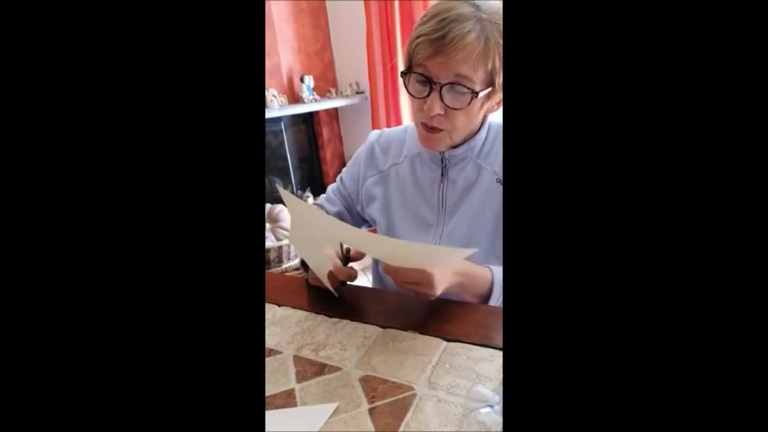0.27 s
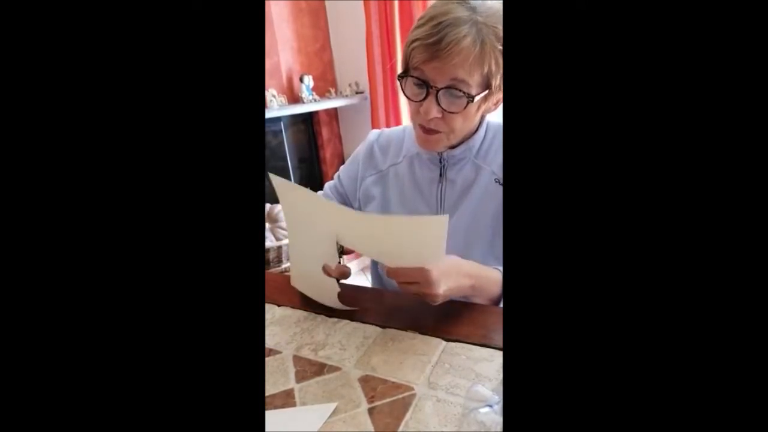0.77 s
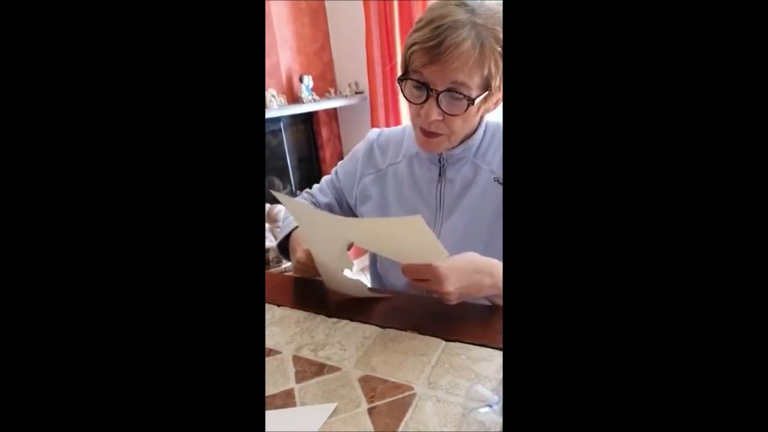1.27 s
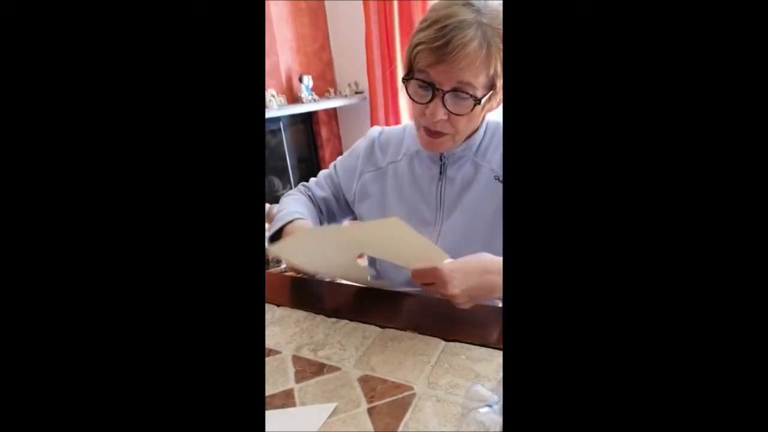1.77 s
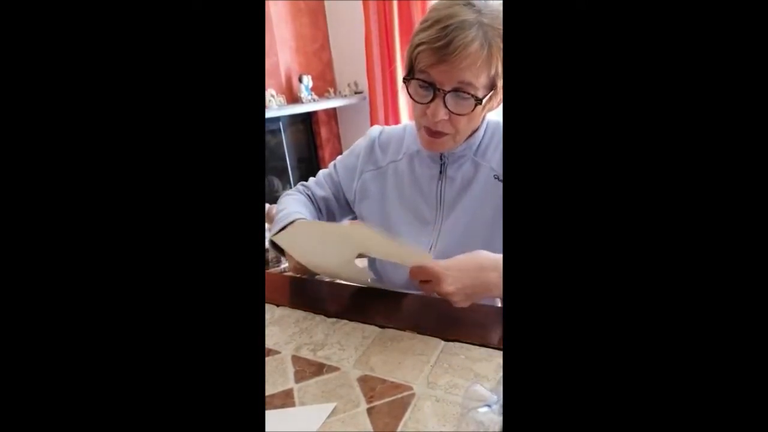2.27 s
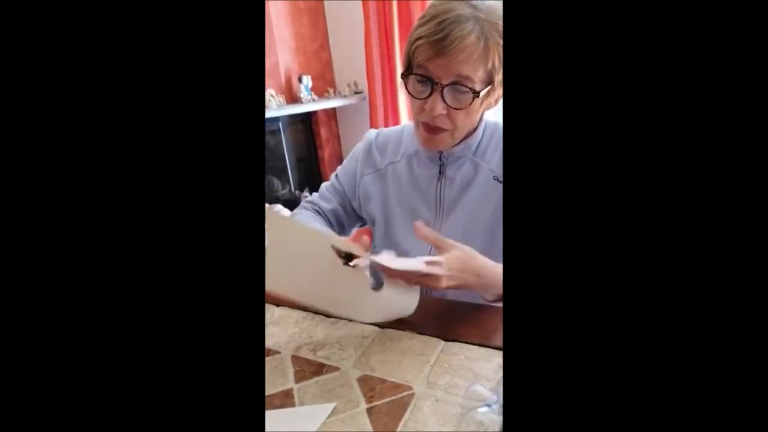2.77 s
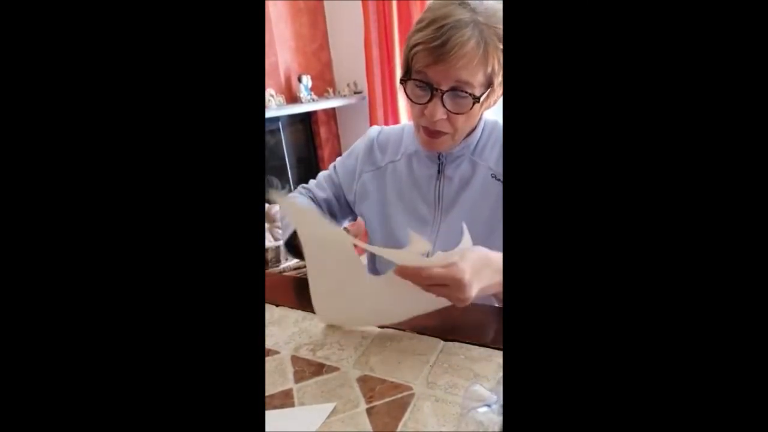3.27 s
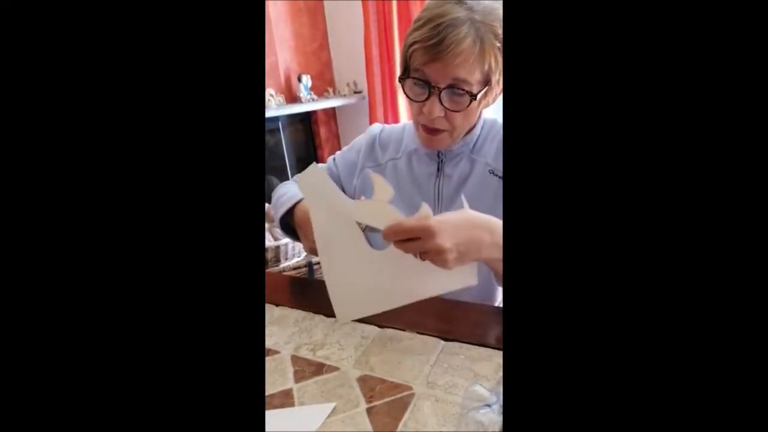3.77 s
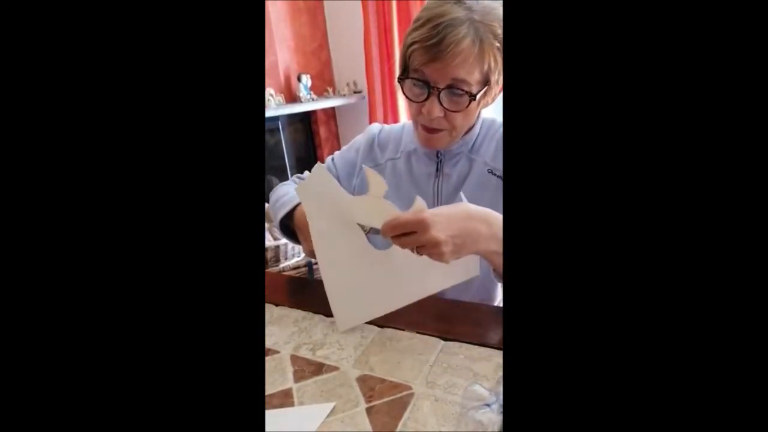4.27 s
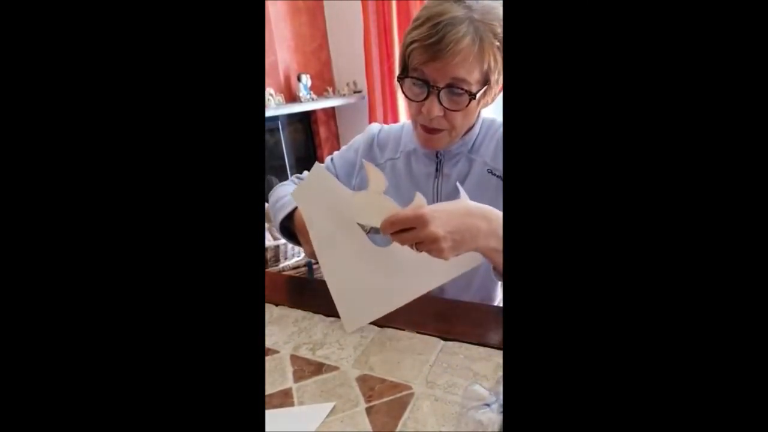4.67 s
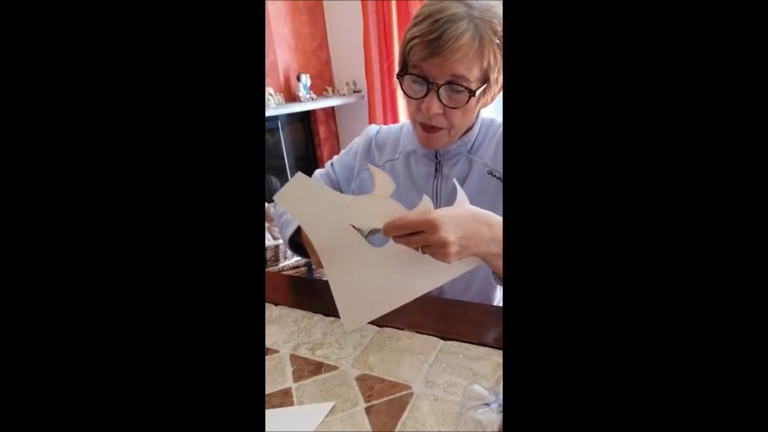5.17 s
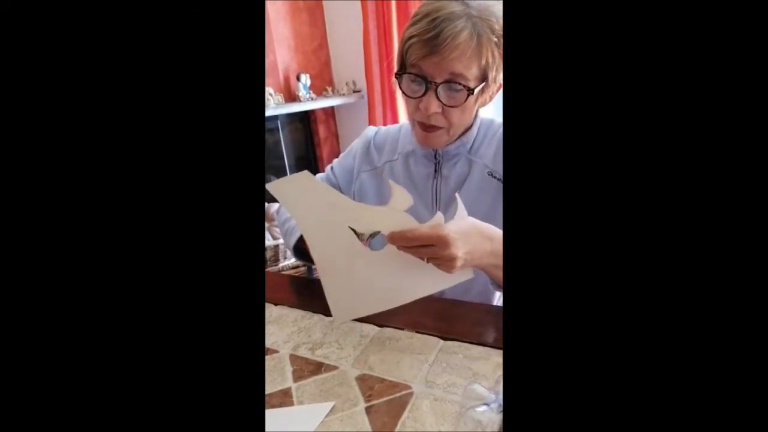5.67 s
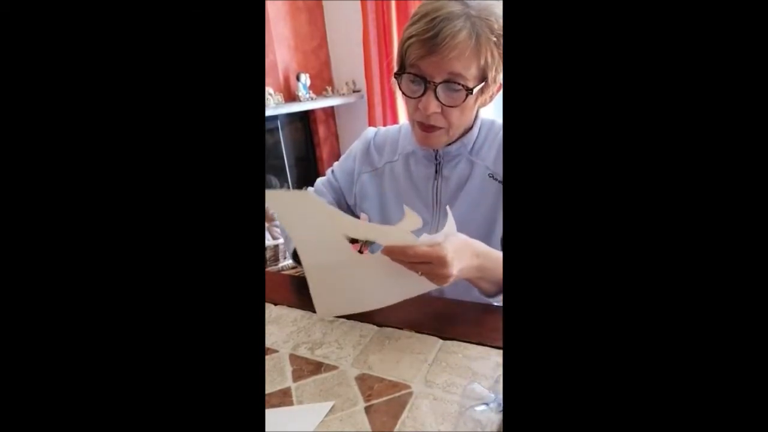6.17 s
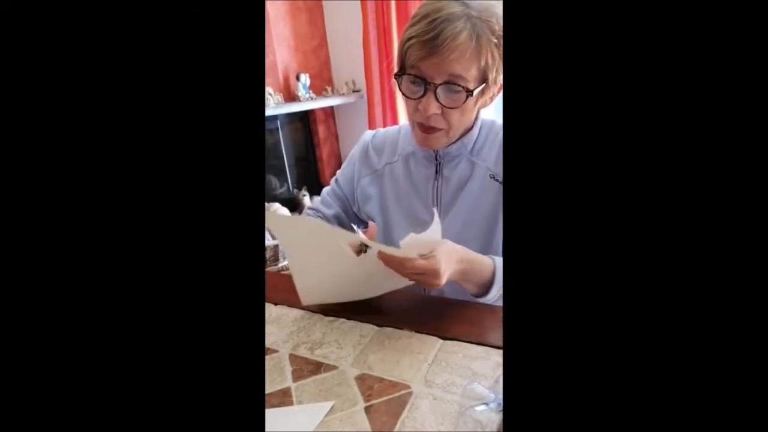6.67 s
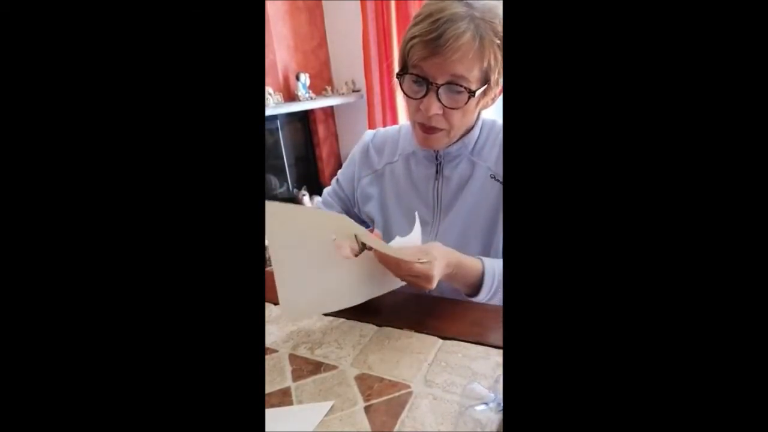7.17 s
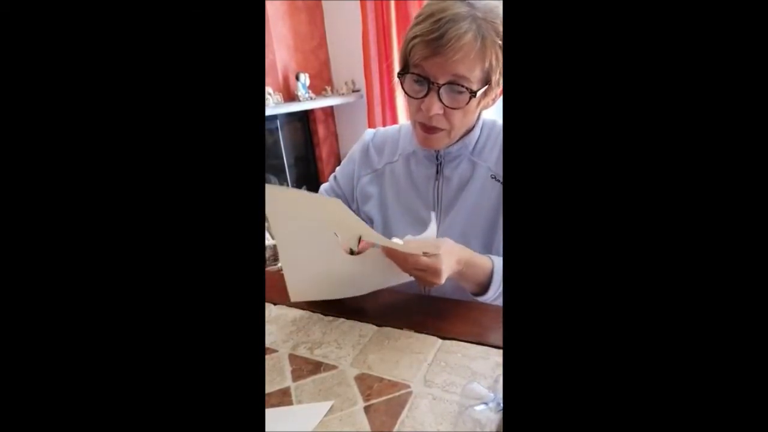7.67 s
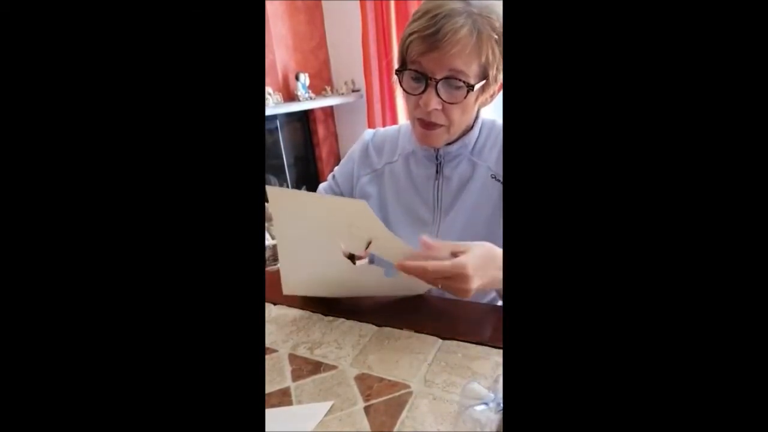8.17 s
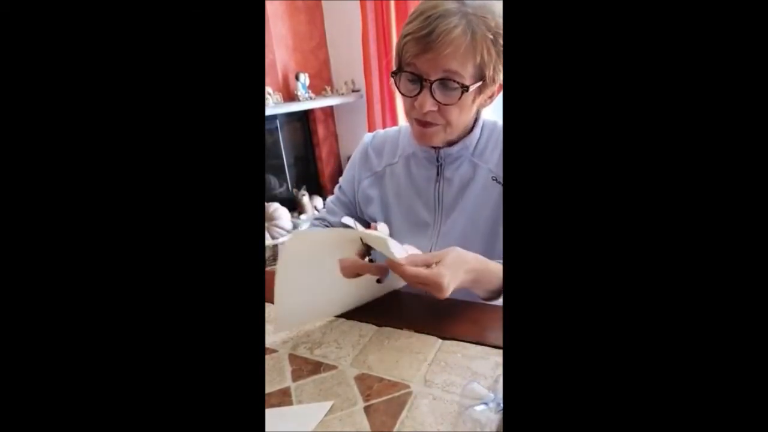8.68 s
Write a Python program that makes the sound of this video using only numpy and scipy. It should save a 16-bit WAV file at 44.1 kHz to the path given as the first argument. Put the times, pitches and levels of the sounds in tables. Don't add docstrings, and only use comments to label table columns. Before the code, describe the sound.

Close in a small quiet room, steady faint hiss and uneven low rumble lie beneath scissors cutting stiff paper. From 0 to 1.8 seconds the sheet bends with dense dry fibre clicks, hollow crease pops and irregular snips, the clearest near 1.3, plus soft table thumps. Around 2 the turned sheet gives a low weak wobble. From 2.7 to 3.6 handling grows busiest: hard finger rubbing, bright crackles, quick snaps and a dull bump. From 3.8 to 5.5 it thins to light shearing, a snip at 4.4 and a faint, high, fuzzy pivot squeak near 5. Snips resume from 5.6, with a bright scrape at 6.2. The hardest, sharpest snap lands near 6.8, then a short squeak at 7. Crisp rustling and snips continue to 8, the sheet wobbles near 8.5, and cutting swells again towards the end at about 9.

```python
import sys
import numpy as np
from scipy import signal
from scipy.fft import rfft, irfft, next_fast_len
from scipy.io import wavfile
from scipy.ndimage import uniform_filter1d

SR = 44100
rng = np.random.default_rng(int(sys.argv[2]) if len(sys.argv) > 2 else 0)


def pcm_store(signal):
    levels = np.round(np.clip(np.atleast_2d(signal), -1, 1) * 32767)
    wavfile.write(sys.argv[1], SR, levels.astype(np.int16).T)


def volts_from_decibels(level):
    exponent = np.asarray(level, float) / 20
    return 10 ** exponent


N = 393813

# f/Hz, level per Hz/dB
PAPER_COLOUR = [(65, -50), (110, -28), (375, -12.5), (556, 3), (729, -2), (879, 2), (1390, -4.5),
                (1860, -4), (2820, -4), (3840, -19), (7170, -13.5), (8830, -15.5), (10900, -27.5),
                (14500, -34), (15800, -27)]
PART_EDGES = [110, 1400, 3900, 10500, 15500]
# f/Hz, level/dB
HUSH_COLOUR = [(12, -32), (20, -5.5), (133, -11), (176, -11.5), (209, -15.5), (308, -15), (386, -20),
               (419, -18), (2370, -25), (3910, -30.5), (5500, -29.5), (15800, -35.5)]
# start t/s, length/s, level/dB, swell over the stroke/dB
BENDS = [(0.0, 0.24, -50, 4), (0.003, 0.021, -38.5, -6.5), (0.39, 0.13, -46.5, -0.8),
         (0.639, 0.18, -43.5, -7.5), (0.918, 0.25, -50.5, -28), (0.948, 0.6, -50.5, -12),
         (1.207, 0.21, -48.5, 6), (1.435, 0.26, -51.5, -3.5), (1.598, 0.036, -43.5, 0),
         (1.741, 0.019, -44.5, 5.5), (1.8, 0.67, -55, -12), (2.298, 0.044, -47, 3), (2.554, 0.098, -64, 13),
         (2.75, 0.5, -55, 5), (2.981, 0.19, -37.5, -31), (3.283, 0.011, -54, 8), (3.54, 0.08, -45, -1),
         (5.579, 0.026, -45, -17), (5.707, 1.4, -65, -1.5), (6.169, 1.9, -59.5, -22),
         (6.659, 0.27, -46.5, -7.5), (6.772, 0.031, -57, -13), (7.197, 0.35, -49, -6.5),
         (7.676, 0.034, -63, 10), (7.725, 0.039, -50, 2.5), (7.758, 0.14, -65, 10),
         (8.017, 0.11, -56.5, 9.5), (8.35, 0.29, -53, 3), (8.578, 0.073, -48, -15)]
# start t/s, length/s, level/dB, swell over the stroke/dB
CUTS = [(0.267, 0.58, -56.5, -0.5), (0.403, 0.03, -57, -12), (1.185, 0.38, -46, -15),
        (1.879, 0.4, -48, -24), (2.277, 0.09, -54, 9.5), (2.562, 0.073, -53, -1), (2.768, 0.38, -51, -8),
        (3.226, 0.15, -59.5, 15), (3.388, 0.22, -58, 13.5), (3.646, 0.37, -62.5, 6.5),
        (4.298, 0.22, -47.5, -6.5), (4.622, 0.02, -63.5, 5.5), (4.9, 0.28, -59, 12.5),
        (5.248, 0.16, -50, 3.5), (5.59, 0.25, -55.5, 2), (6.166, 0.2, -54, -31), (6.477, 0.64, -72, 13),
        (6.535, 0.12, -52.5, -12), (6.66, 0.075, -59, 3), (6.8, 0.047, -61, -21), (6.857, 0.15, -50.5, 1.5),
        (7.154, 0.17, -55.5, 6.5), (7.427, 0.32, -43, -53), (7.913, 0.15, -62.5, 18),
        (8.213, 0.029, -58.5, 7), (8.378, 0.36, -48.5, -3.5), (8.829, 0.24, -46, 29)]
# start t/s, length/s, level/dB, swell over the stroke/dB
RUBS = [(0.398, 0.099, -50, -13), (0.636, 0.069, -47.5, 9), (0.738, 0.1, -44, -4.5), (0.947, 0.47, -50, -2),
        (1.553, 0.64, -61.5, 3.5), (1.89, 0.08, -58, 13), (2.118, 0.99, -62, 1), (2.72, 0.21, -61.5, 15.5),
        (2.979, 0.064, -40.5, 3), (3.093, 0.09, -42, 2), (3.219, 0.025, -37, -6.5),
        (3.286, 0.064, -38.5, -7), (3.451, 0.67, -50, -24), (3.783, 0.024, -54.5, 7),
        (4.265, 0.17, -57.5, 5.5), (4.787, 0.095, -64.5, 6), (4.888, 0.042, -52.5, 5.5),
        (4.95, 0.43, -50.5, 3), (5.357, 0.16, -48, -20.5), (5.575, 0.032, -51, 1.5),
        (5.711, 0.16, -49.5, -9.5), (6.042, 0.33, -67, 17), (6.178, 0.11, -42, -4), (6.562, 0.079, -57, 10),
        (6.622, 0.04, -45.5, -6), (6.71, 0.03, -53, 8.5), (6.978, 0.045, -52.5, 1),
        (7.205, 0.1, -54.5, 6.5), (7.417, 0.15, -45, -9.5), (7.669, 0.03, -50.5, 1.5),
        (7.724, 0.064, -44.5, -5), (7.852, 0.24, -56.5, -10), (8.008, 0.089, -45.5, -7.5),
        (8.334, 0.22, -60.5, 20.5), (8.593, 0.45, -54, 20)]
# start t/s, length/s, level/dB, swell over the stroke/dB
SLIDES = [(0.402, 0.04, -75, -1.5), (0.655, 0.069, -65, 2), (1.102, 0.096, -75, 4), (1.921, 0.064, -67, 8),
          (2.98, .04, -67, -1.5), (3.59, 0.027, -59.5, -5), (4.626, 0.018, -78, -1.5),
          (5.583, 0.035, -68, -1.5), (6.181, 0.046, -49, -6.5), (7.649, .006, -68, -6),
          (8.531, 0.082, -64, -1.5), (8.832, .1, -71, 16)]
# flexing/dB, blade edge/dB, fibre fizz/dB, finest fizz/dB
STIRRED_PARTS = [(-3.5, -9.5, -11.5, -19.5), (-11, -4, -8.5, -35), (-15, -7, -3, -11.5),
                 (-30, -30, -6, 13.5)]
# t/s, ring f/Hz, ring level/dB
CREASES = [(0.105, 470, -42.5), (0.202, 508, -37.5), (0.284, 450, -48.5), (0.385, 560, -50),
           (0.497, 594, -43), (0.7, 585, -49), (0.914, 690, -50.5), (0.975, 485, -45.5), (1.072, 610, -46),
           (1.189, 965, -45.5), (1.23, 840, -43), (1.285, 588, -43.5), (1.59, 530, -47), (1.613, 512, -39),
           (1.877, 576, -68), (2.292, 1188, -42.5), (2.335, 706, -55), (5.28, 1126, -46.5),
           (3.022, 526, -44), (3.444, 584, -66), (3.55, 427, -67), (5.599, 1000, -46), (7.493, 796, -46.5),
           (7.719, 697, -49.5), (7.853, 743, -45), (8.145, 450, -53), (8.218, 533, -56), (8.35, 480, -56)]
# t/s, edge peak level/dB, ring f/Hz, ring level/dB, fizz level/dB
SNIPS = [(0.429, -30.5, 575, -38.5, -42.5), (0.943, -49, 735, -54, -40), (1.335, -24.5, 682, -41.5, -37),
         (1.742, -44, 586, -55, -53), (2.556, -39, 540, -56.5, -47.5), (2.762, -51, 393, -48, -44),
         (2.854, -30, 436, -62, -61), (2.918, -26, 420, -49, -45), (3.283, -21.5, 478, -44.5, -34),
         (3.545, -21, 630, -39.5, -64), (4.412, -34, 988, -68, -44), (2.979, -24, 580, -49, -45),
         (5.577, -46, 1130, -51, -49), (5.71, -35, 1140, -50.5, -51), (5.805, -35, 970, -58, -46),
         (6.177, -31.5, 528, -43, -37), (6.53, -45, 960, -81, -63), (6.771, -12.5, 556, -41, -62),
         (7.161, -39.5, 470, -58, -50.5), (7.387, -37, 800, -65, -49), (7.414, -29.5, 868, -42, -40.5),
         (7.652, -43, 840, -68, -47), (8.009, -27, 1130, -69, -45), (8.83, -55, 675, -91, -57)]
# t/s, peak level/dB, f/Hz
EDGE_POPS = [(0.1062, -40, 1780), (0.3641, -51, 3200), (0.4, -48, 2300), (0.4289, -43, 2610),
             (0.9443, -46, 1930), (1.0455, -46, 2870), (1.2296, -37, 1460), (1.288, -38, 2210),
             (1.3354, -33.5, 2160), (1.5918, -35.5, 2300), (1.6137, -33.5, 1890), (1.7424, -41, 2230),
             (2.2897, -53, 1970), (2.3346, -48, 2320), (2.5546, -42.5, 1980), (2.6184, -46, 2060),
             (2.7651, -34.5, 2440), (2.8534, -39, 2670), (2.9183, -41, 2110), (2.9776, -29.5, 2350),
             (3.0145, -31.5, 2380), (3.1193, -39, 2560), (3.2829, -33, 1760), (3.5304, -44, 1900),
             (3.5448, -37, 2500), (4.4104, -46, 1960), (5.2819, -38, 2230), (5.7119, -41, 2210),
             (5.8077, -52, 1910), (6.1779, -37, 1815), (6.5306, -44, 2370), (6.573, -42, 2200),
             (6.6134, -42.5, 2190), (6.7263, -41, 2440), (6.7718, -23, 2584), (6.7782, -28.5, 2110),
             (6.79, -31, 1800), (0.58, -45, 1990), (6.826, -33, 1680), (6.846, -38, 1950),
             (7.1671, -49, 1660), (7.3876, -42, 2440), (7.418, -34, 1590), (7.442, -36, 1880),
             (7.652, -46.5, 2800), (7.7204, -45, 2640), (8.0097, -36, 1560), (8.3794, -43, 2320),
             (8.5689, -37.5, 2710), (8.8179, -40, 2670), (8.9136, -32, 2400)]
# t/s, peak level/dB, f/Hz
SHEET_POPS = [(0.218, -41, 955), (0.204, -34, 524), (0.364, -42.5, 470), (0.386, -35.5, 520),
              (0.433, -40, 990), (0.499, -50, 566), (0.635, -43, 654), (0.654, -37, 630), (0.68, -38, 650),
              (0.705, -44, 574), (0.914, -49, 735), (0.943, -42, 726), (1.07, -47, 544), (1.191, -40, 970),
              (1.21, -38, 920), (1.292, -43, 600), (1.339, -36, 676), (1.575, -40, 543), (1.59, -32.5, 540),
              (1.611, -39, 490), (1.741, -34, 590), (1.879, -36, 580), (1.974, -41.5, 580),
              (2.293, -40, 1155), (2.982, -28.5, 593), (3.014, -39, 580), (3.282, -46, 890),
              (3.3, -37, 960), (3.443, -40.5, 577), (3.53, -38, 547), (3.545, -32.5, 438),
              (4.416, -41, 960), (5.807, -44, 980), (6.178, -40.5, 576), (6.663, -43, 640),
              (6.68, -46, 940), (6.7712, -27, 540), (7.414, -35, 837), (7.675, -45, 880),
              (7.719, -37.5, 720), (7.853, -57, 713), (8.219, -41, 542), (8.399, -45.5, 660)]
# t/s, peak level/dB, f/Hz
FIBRE_POPS = [(0.2848, -50, 7300), (0.3641, -49, 7360), (0.4, -45, 7500), (0.4976, -57, 7100),
              (0.6649, -37, 8800), (0.9772, -36, 7260), (1.5908, -40.5, 6800), (1.7045, -51, 5000),
              (1.7474, -38.5, 4800), (2.1246, -44.5, 8800), (2.3357, -43, 4560), (2.9827, -32.5, 5680),
              (3.032, -33, 7100), (3.1278, -37, 7220), (3.1567, -40, 7040), (3.1784, -30, 6840),
              (3.2178, -31, 6700), (3.2303, -34, 6830), (3.2845, -29, 5460), (3.303, -38, 7330),
              (4.415, -35, 6220), (5.28, -44, 7300), (5.5073, -51, 8950), (5.6022, -40.5, 6860),
              (6.1724, -49, 7300), (6.1789, -32.5, 7340), (6.2382, -38, 7240), (6.728, -42, 8490),
              (7.4955, -38, 7060), (7.5097, -34, 7200), (7.568, -38, 8330), (7.654, -28.5, 7400),
              (7.705, -41, 7260), (7.7266, -40, 7100), (7.748, -40, 6970), (7.7785, -37.5, 7400),
              (7.7974, -44, 7010), (7.852, -44, 8130), (8.011, -49, 7470), (8.3536, -49, 7000),
              (8.4482, -38, 7730), (8.6173, -41, 7260), (8.8315, -41, 8450), (8.8677, -35, 7200),
              (8.9038, -34, 5050)]
# t/s, peak level/dB, f/Hz
THUMPS = [(0.14, -43.5, 155), (0.197, -49, 348), (1.439, -51.5, 352), (1.739, -49.5, 345),
          (1.989, -44, 370), (2.624, -50, 194), (2.78, -51, 207), (3.215, -48.5, 324), (3.287, -45.5, 188),
          (3.3, -44.5, 332), (3.44, -50, 211), (3.541, -40, 225), (3.873, -50.5, 219), (4.411, -49.5, 230),
          (6.237, -49.5, 147), (6.77, -42, 184), (6.776, -39, 340), (6.8, -57, 305), (6.915, -55, 330),
          (7.162, -56, 127), (8.112, -47.5, 139), (8.57, -43, 328)]
# t/s, peak level/dB, dull part over
# bright part/dB
TICKS = [(0.165, -32.5, -15), (0.4, -23.5, 11.5), (1.045, -28, -15), (1.7043, -32.5, 16), (1.742, -23, 10),
         (2.6352, -27, -3), (3.217, -26, -30), (3.2847, -39, -11), (2.786, -32, 6), (4.283, -39.5, 7),
         (4.93, -41, 10), (5.167, -27.5, -4), (5.298, -31, -8), (5.65, -31, 8), (6.485, -33.5, 9),
         (6.5722, -41, -7), (6.666, -23, -5), (6.7779, -8, 50), (7.241, -32, -3), (7.4941, -45, -1),
         (7.509, -26.5, -27), (7.568, -37, -14), (7.6522, -26.5, -14), (7.749, -36, 0), (7.778, -31, -4),
         (8.026, -42, -3), (8.054, -45, 0), (2.8177, -38, 10), (8.618, -26, 6), (8.8316, -25, -6)]
# t/s, f/Hz, level/dB
WOBBLES = [
    [(1.96, 241, -64), (2.2, 177, -80)],
    [(8.54, 220, -65.5), (8.93, 161, -77.5)],
]
# t/s, f/Hz, level/dB
SQUEAKS = [
    [(4.78, 6200, -77), (4.8, 6100, -63), (4.868, 6230, -61), (4.906, 5960, -53), (4.946, 6060, -68),
     (5.052, 6250, -52.5), (5.1, 6100, -80)],
    [(6.95, 6280, -68), (6.994, 6270, -57), (7.014, 6340, -48.5), (7.07, 6300, -80)],
]
# f/Hz, time to fall 60 dB/s
ROOM_DECAY = [(200, 0.67), (600, 0.23), (2000, 0.28), (6000, 0.17), (14000, 0.11)]
# f/Hz, likeness from 0 to 1
PORT_LIKENESS = [(40, 0.091), (130, 0.17), (300, 0.67), (700, 0.52), (1500, 0.028), (15000, 0.045)]
# f/Hz, difference/dB
PORT_LEAN = [(60, 3), (200, -3.5), (750, -5.5), (1150, 2), (2400, -5.5), (6600, -10), (8300, 10),
             (13000, 1)]
PLACE_LAGS = [-4e-4, 3e-5, 2.6e-4]
# f/Hz, width/Hz, level/dB
RINGS = [(7100, 117, 4), (5200, 100, 1.5), (9120, 210, 1.5), (2500, 170, -1.5), (1300, 270, 0)]
# f/Hz, width/Hz, level/dB
HOLLOW = (4130, 280, -2.2)


def evened(x):
    return x / np.sqrt(np.mean(abs(x) ** 2) + 1e-20)


def smooth_noise(first, second):
    noise = uniform_filter1d(rng.standard_normal(N), size=first)
    return evened(uniform_filter1d(noise, size=second))


def read(points, hz):
    f, value = np.transpose(points)
    return np.interp(np.log(hz + 1), np.log(f + 1), value)


def add(mix, s, sound):
    part = mix[round(s * SR):][:len(sound)]
    part += sound[:len(part)]


def sine(hz, t, phase=0):
    return np.sin(2 * np.pi * hz * t + phase)


def parts(hz):
    steps = [1 / (1 + (edge / (hz + 1)) ** 14) for edge in PART_EDGES]
    steps[-1] = 0 * hz
    colour = volts_from_decibels(read(PAPER_COLOUR, hz))
    shapes = np.array([colour * np.sqrt(a - b) for a, b in zip(steps, steps[1:])])
    return shapes / np.sqrt(np.mean(shapes ** 2, axis=1, keepdims=True))


def resonate(x, hz, width):
    turn = np.exp(2j * np.pi * np.cumsum(hz * np.ones(len(x))) / SR)
    r = np.exp(-np.pi * width / SR)
    return 2 * (turn * signal.lfilter([1 - r], [1, -r], x / turn)).real


def ports(pair, hz):
    same = np.clip(read(PORT_LIKENESS, hz), 0, 1)
    return np.array([pair[0], same * pair[0] + np.sqrt(1 - same ** 2) * pair[1]])


def hush(level_db=-66.0, bump_db=1.5):
    hz = np.fft.rfftfreq(N, 1 / SR)
    z = ports(rfft(rng.standard_normal((2, N))), hz) * volts_from_decibels(read(HUSH_COLOUR, hz))
    low = 1 / (1 + (hz / 170) ** 4)
    lean = volts_from_decibels(np.outer([.5, -.5], read(PORT_LEAN, hz)))
    hiss = irfft(z * (1 - low), N)
    rumble = irfft(z * low * lean, N)
    bumps = volts_from_decibels(bump_db * smooth_noise(5000, 3000))
    return volts_from_decibels(level_db) * evened(hiss + bumps * rumble)


def strokes(rows, t, rise_db_per_s=2200, fall_db_per_s=335):
    power = np.zeros(len(t))
    for s, length, db, *swell_db in rows:
        before_db = rise_db_per_s * np.maximum(s - t, 0)
        after_db = fall_db_per_s * np.maximum(t - s - length, 0)
        inside_db = sum(swell_db) * np.clip((t - s) / length, 0, 1)
        power += volts_from_decibels(db + inside_db - (before_db + after_db)) ** 2
    return power


def rustle(per_s=1400, spread_db=4., clump_db=2.1, hiss=.5, patchy_db=2.4):
    size_db = spread_db * np.minimum(rng.exponential(1, (3, N)), 3.2)
    size = volts_from_decibels(size_db) * rng.choice([-1., 1.], (3, N))
    clicks = evened(size * (rng.random((3, N)) < per_s / SR))
    clicks = clicks + hiss * rng.standard_normal((3, N))
    clumped = evened(clicks * volts_from_decibels(clump_db * smooth_noise(500, 200)))
    hz, t, z = signal.stft(clumped, SR, nperseg=512, noverlap=384)
    patches = uniform_filter1d(rng.standard_normal(z[0].shape), size=5, axis=0)
    patches = evened(uniform_filter1d(patches, size=14, axis=1))
    motions = [strokes(rows, t) for rows in (BENDS, CUTS, RUBS, SLIDES)]
    powers = volts_from_decibels(STIRRED_PARTS).T ** 2 @ motions
    shape = np.sqrt(parts(hz).T ** 2 @ powers) * evened(volts_from_decibels(patchy_db * patches))
    return signal.istft(z * shape, SR, nperseg=512, noverlap=384)[1][:, :N]


def snaps(crack_t60=.013, ring_t60=0.068, ring=0.61, edge_drop_db=-7.5, rise_s=0.001):
    out, t = np.zeros(N), np.arange(4096) / SR
    shapes = parts(np.fft.rfftfreq(4096, 1 / SR))
    rows = SNIPS + [(s, db + 8, hz, db, db - 3) for s, hz, db in CREASES]
    noises = rng.standard_normal((len(rows), 2, 4096))
    crack_fade = volts_from_decibels(-60 * t / crack_t60) + volts_from_decibels(-20 - 60 * t / .06)
    crack_fade = crack_fade * np.minimum(t / rise_s, 1)
    for (s, peak_db, hz, sheet_db, fizz_db), (a, b) in zip(rows, noises):
        gains = volts_from_decibels([sheet_db - 5.0, peak_db + edge_drop_db, fizz_db, fizz_db - 27.0])
        crack = irfft(rfft(a) * np.sqrt(gains ** 2 @ shapes ** 2)) * crack_fade
        tone = sine(hz, t) + .5 * sine(1.8 * hz, t, b[0])
        ring_fade = volts_from_decibels(sheet_db - 60 * t / ring_t60) * np.minimum(t / 0.00088, 1)
        add(out, s, crack + ring * ring_fade * tone)
    return out


def pops(rows, rise_s, level_db, pair=1.07):
    out, t = np.zeros(N), np.arange(2048) / SR
    swell = t / rise_s * np.exp(1 - t / rise_s)
    for s, db, hz in rows:
        tone = sine(hz, t) + 0.38 * sine(pair * hz, t)
        add(out, s, volts_from_decibels(db + level_db) * tone * swell)
    return out


def thumps(t60=0.032):
    out, t = np.zeros(N), np.arange(6000) / SR
    for s, db, hz in THUMPS:
        push = sine(hz, t) - 0.3 * sine(0.59 * hz, t)
        add(out, s, volts_from_decibels(db - 60 * t / t60) * push * np.minimum(t / 0.0019, 1))
    return out


def ticks(t60=0.011, rise_s=0.001):
    out, t = np.zeros(N), np.arange(512) / SR
    _, edge, fizz, finest = parts(np.fft.rfftfreq(512, 1 / SR))
    for (s, db, edge_db), noise in zip(TICKS, rng.standard_normal((len(TICKS), 512))):
        click = evened(irfft(rfft(noise) * (volts_from_decibels(edge_db) * edge + fizz + 0.059 * finest)))
        click = click * volts_from_decibels(-60 * t / t60) * np.minimum(t / rise_s, 1)
        add(out, s, volts_from_decibels(db - 7.0) * click / abs(click).max())
    return out


def wobbles(width_hz=170):
    out = np.zeros(N)
    for rows in WOBBLES:
        s, hz, db = np.transpose(rows)
        t = np.arange(s[0], s[-1], 1 / SR)
        centre = np.interp(t, s, hz)
        push = resonate(rng.standard_normal(len(t)), centre, width_hz)
        push = evened(resonate(push, centre, width_hz))
        add(out, s[0], push * volts_from_decibels(np.interp(t, s, db) + 0.5) * signal.windows.tukey(len(t), .1))
    return out


def squeaks(width_hz=260, throb_db=5.5):
    out = np.zeros(N)
    for rows in SQUEAKS:
        s, hz, db = np.transpose(rows)
        t = np.arange(s[0], s[-1], 1 / SR)
        slips, throb = rng.standard_normal((2, len(t)))
        whistle = evened(resonate(slips, np.interp(t, s, hz), width_hz))
        throb = evened(uniform_filter1d(throb, size=350))
        level_db = np.interp(t, s, db) + 0.5 + throb_db * throb
        add(out, s[0], whistle * volts_from_decibels(level_db) * signal.windows.tukey(len(t), .15))
    return out


def path(x, lag_s, wet_db=-3.0):
    taps = np.zeros((2, SR // 2))
    at = np.arange(60, SR // 2 - 20, 20) + rng.integers(0, 20, (2, (SR // 2 - 61) // 20))
    np.put_along_axis(taps, at, rng.choice([-1., 1.], at.shape), 1)
    hz, t, z = signal.stft(taps, SR, nperseg=256)
    fade = volts_from_decibels(-60 * t / read(ROOM_DECAY, hz)[:, None])
    tail = signal.istft(z * fade, SR, nperseg=256)[1]
    size = next_fast_len(N + SR)
    hz = np.fft.rfftfreq(size, 1 / SR)
    wet = volts_from_decibels(wet_db) * ports(rfft(tail / np.linalg.norm(tail[0]), size), hz)
    side = np.array([[.5], [-.5]])
    direct = np.exp(-2j * np.pi * side * hz * lag_s)
    ring_db = sum(db * np.exp(-((hz - centre) / width) ** 2) for centre, width, db in RINGS + [HOLLOW])
    heard = volts_from_decibels(side * read(PORT_LEAN, hz) + ring_db) * (direct + wet)
    return irfft(rfft(x, size) * heard, size)[:, :N]


def room(spread, single, turns_per_s=1.3):
    turn = np.pi * turns_per_s * np.arange(N) / SR
    shares = [np.sqrt(2 / 3) * abs(np.cos(turn + k * np.pi / 3)) for k in range(3)]
    return sum(path(x + single * share, lag_s) for x, share, lag_s in zip(spread, shares, PLACE_LAGS))


def scene():
    single = volts_from_decibels(3.5) * snaps() + volts_from_decibels(1.0) * thumps() + ticks() + wobbles() + squeaks()
    near = pops(EDGE_POPS, 0.0015, -2.0, pair=1.18)
    near += pops(SHEET_POPS, 0.0021, -1.2, pair=1.313)
    near += pops(FIBRE_POPS, 0.00058, 0.75)
    return hush() + room(volts_from_decibels(-8.0) * rustle(), single) + path(near, PLACE_LAGS[0], wet_db=-4.0)


def top_cut(x):
    return signal.sosfilt(signal.butter(12, 16480, fs=SR, output="sos"), x)


def record(dry):
    low_pass = signal.firwin(255, 15650, window=("kaiser", 5), fs=SR)
    limited = signal.oaconvolve(dry, low_pass[None], "same")
    return top_cut(limited)


dry = scene()
out = record(dry)
pcm_store(out)
```